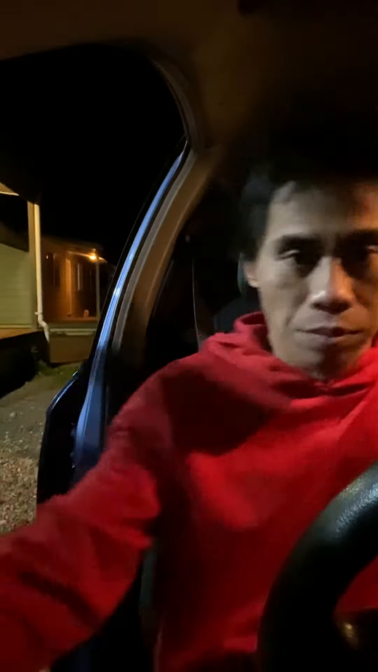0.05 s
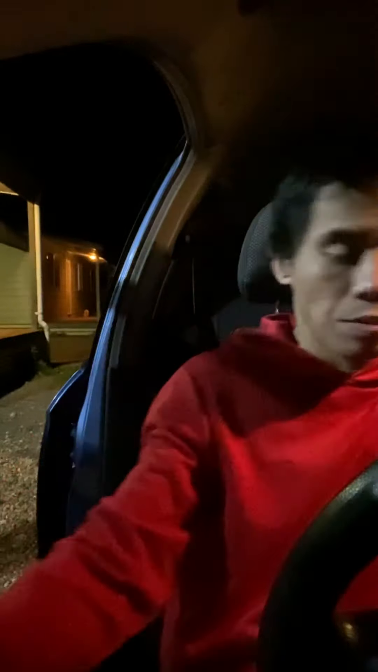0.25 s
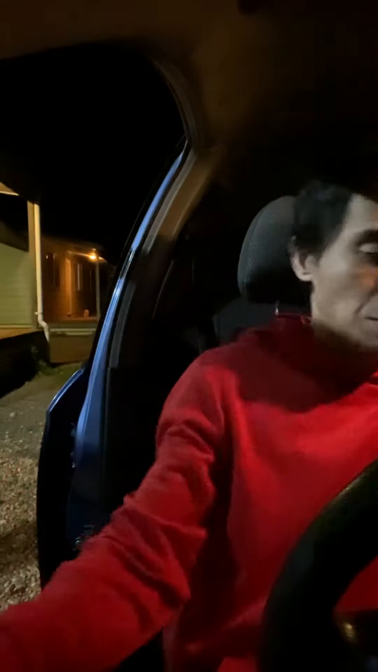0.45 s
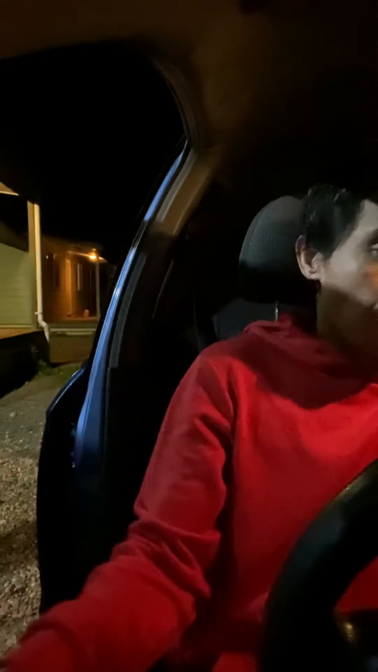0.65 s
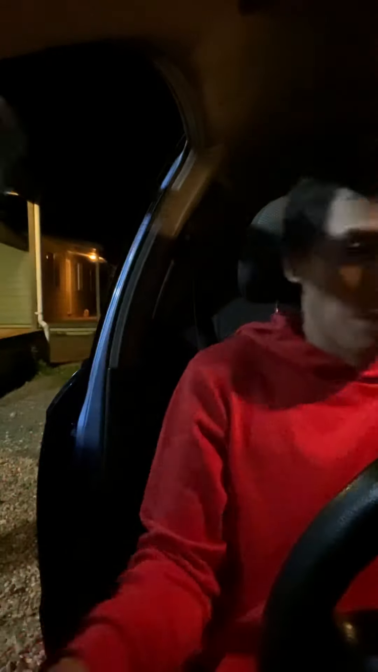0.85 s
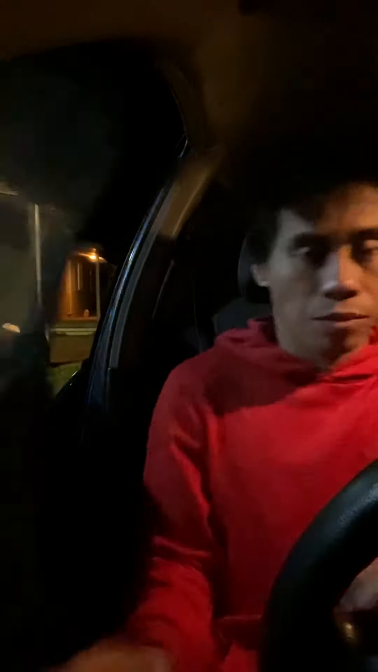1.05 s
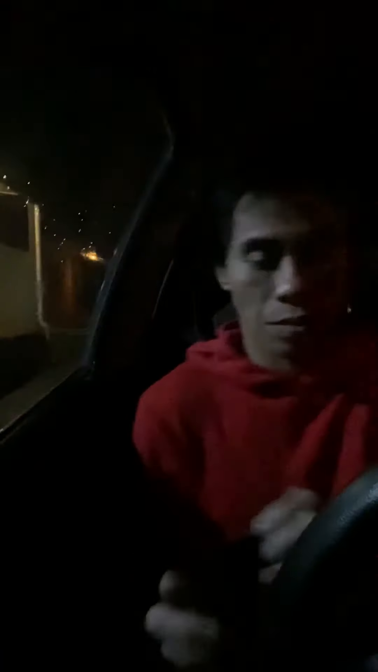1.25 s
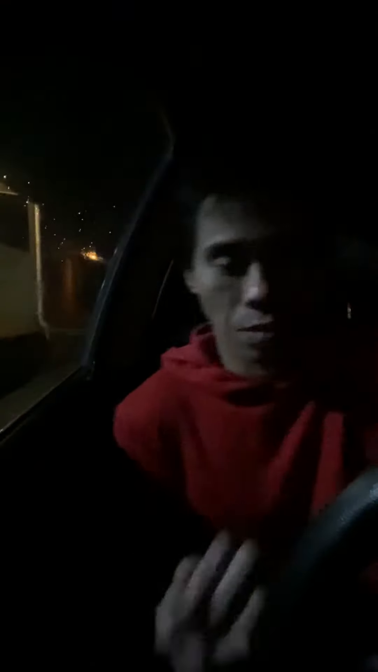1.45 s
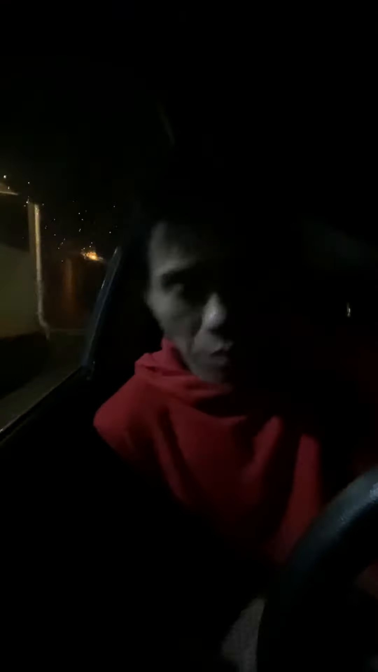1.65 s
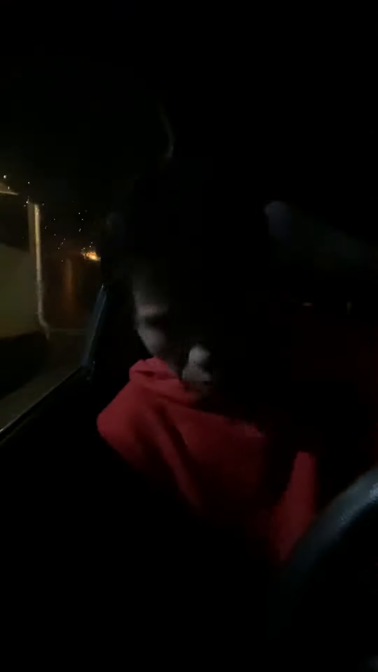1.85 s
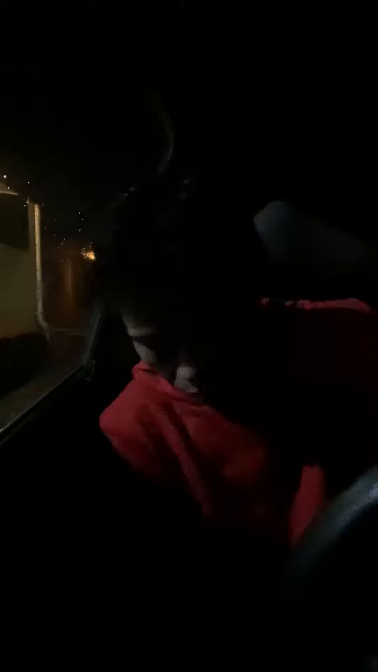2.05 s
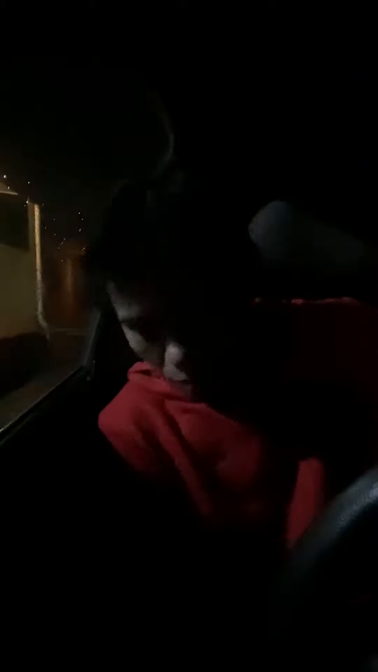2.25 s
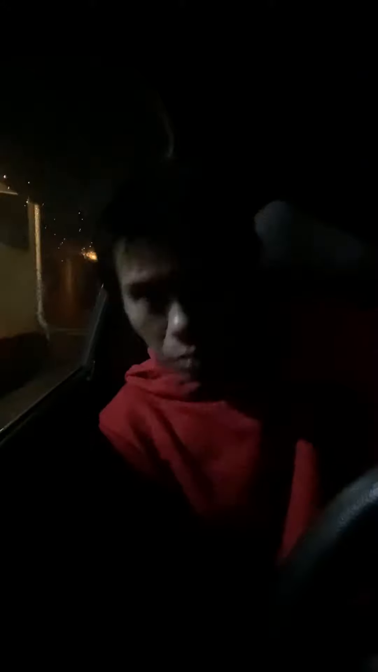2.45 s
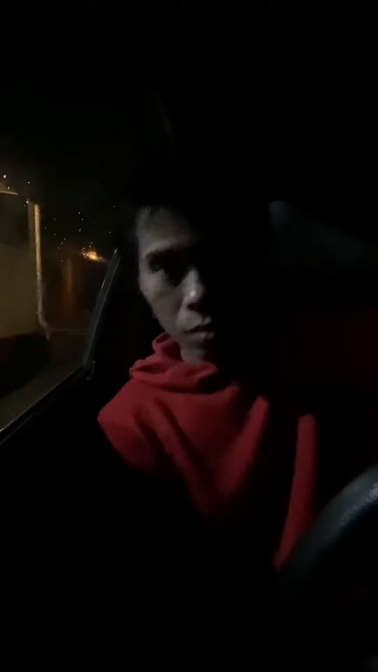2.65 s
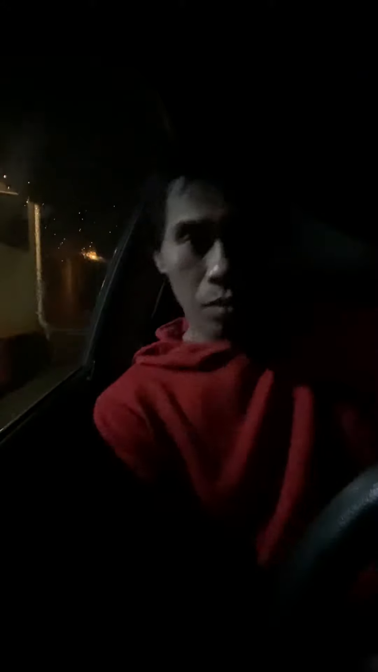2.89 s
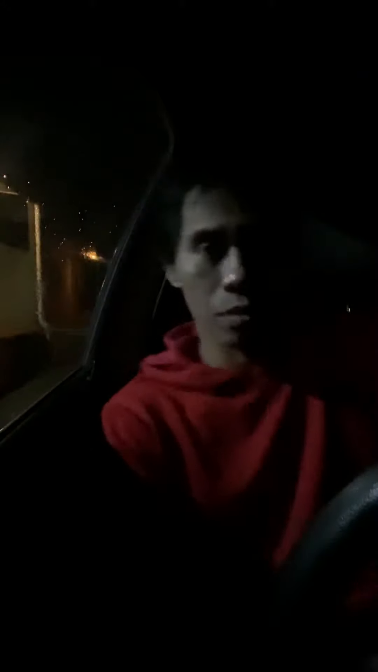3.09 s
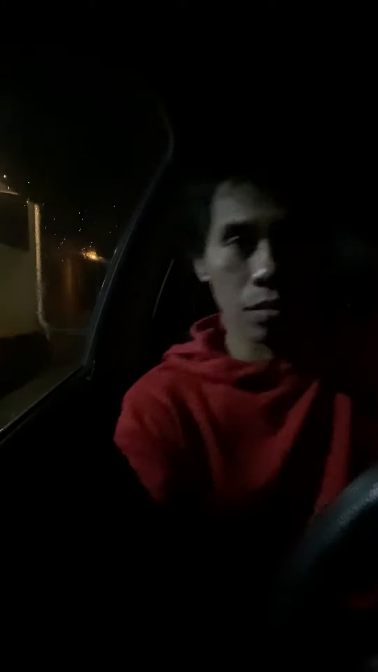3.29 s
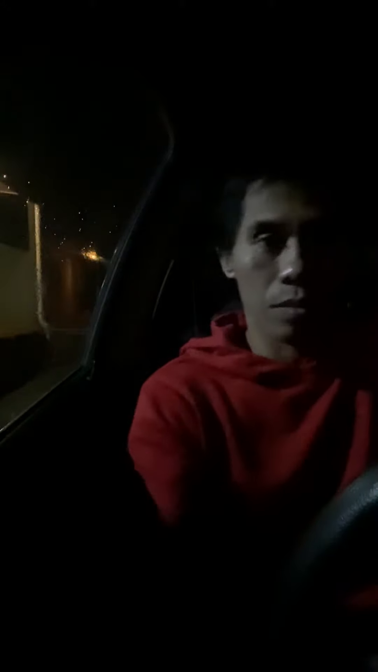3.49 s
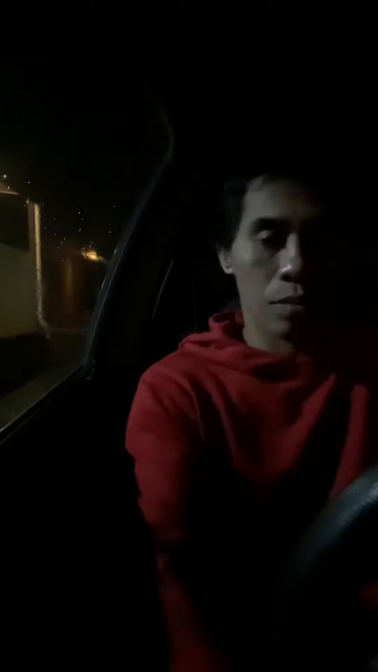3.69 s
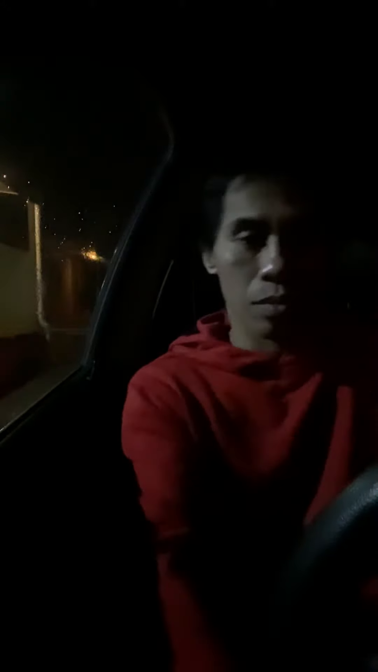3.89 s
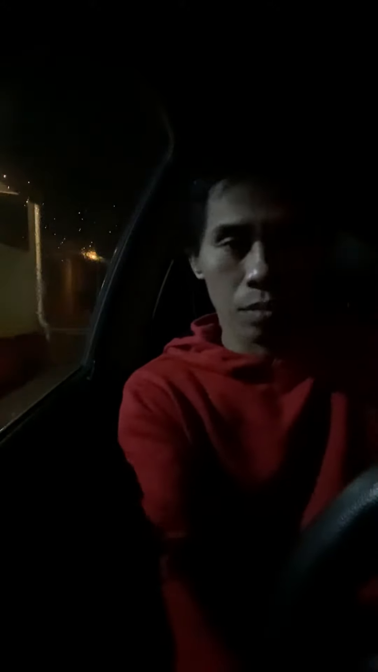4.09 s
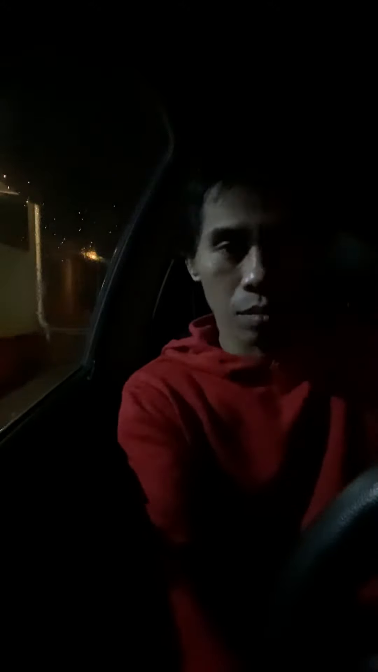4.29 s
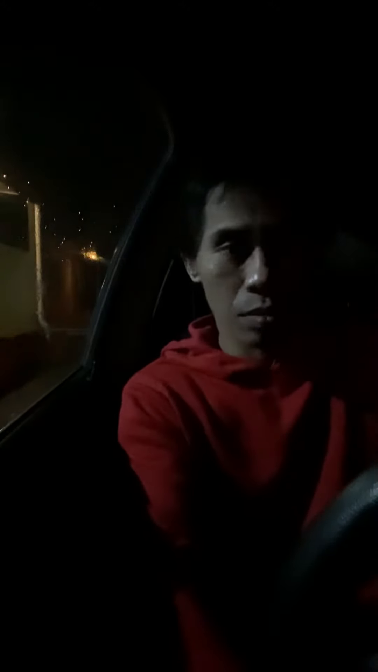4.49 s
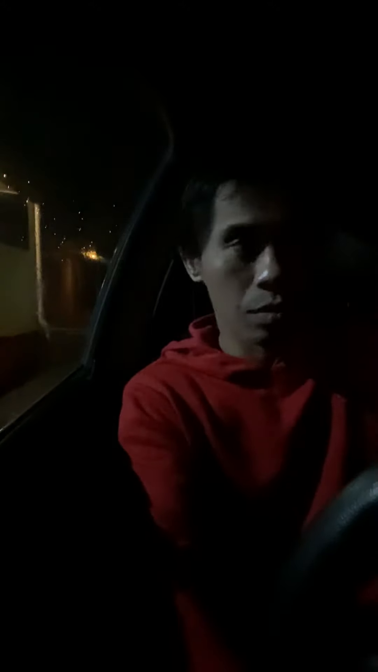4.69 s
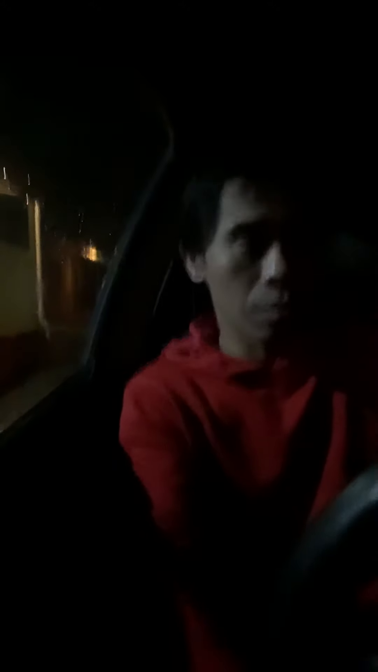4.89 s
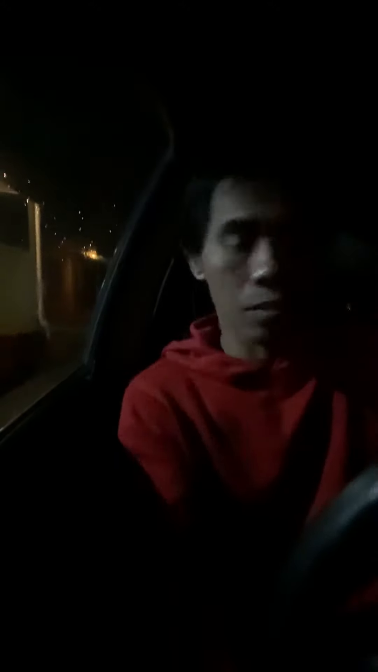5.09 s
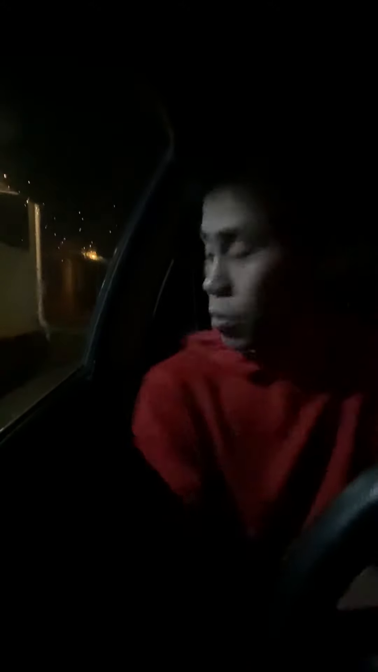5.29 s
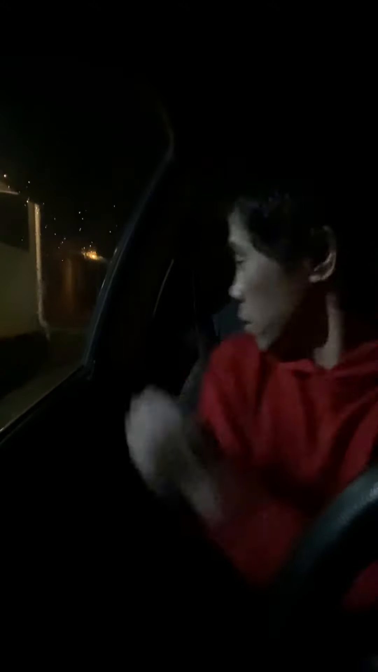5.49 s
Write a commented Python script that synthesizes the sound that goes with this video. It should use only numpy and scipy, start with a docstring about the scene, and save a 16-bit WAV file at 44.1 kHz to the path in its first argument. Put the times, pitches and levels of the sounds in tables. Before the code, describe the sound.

The interior of a parked car, close and dry, with very short padded echoes. For the first second there is only soft low rumble, faint cloth rustle and a small dull bump near 0.2 s. At about 1.15 s the door slams: a latch clank, a hard crack and deep thump, a brief rattle choked by the seal, and a low boom fading by about 1.5 s. Light movement and tiny key ticks follow. From 2.2 to 2.6 s comes a cluster of bright metallic jingles and plastic snaps, another clack at 3.0, and the sharpest clicks at 3.35 to 3.45 s. It quiets to faint rustling. At 4.2 s the starter growls in short, muted heaves with a faint gear whine. Near 4.7 s the engine catches, runs up in pitch, and by 5.1 s hums low around 50 Hz with soft uneven knocks, some last trim clicks and a bump, continuing to the end at 5.5 s.

```python
"""A car door slams at night, seats and clothes rustle, keys and trim click, then the engine starts and hums.
The slam is fading noise with a ringing latch; knocks are dying sines, and clicks are bursts of grit with rings.
The starter is noise through resonances; the engine is a low sine with a knock for each firing.
A soft rumble and hiss lie under it all, and short echoes give the knocks, clicks and motors a padded cabin."""
import sys
import numpy as np
from scipy import signal
from scipy.fft import rfft, irfft, next_fast_len
from scipy.io import wavfile
from scipy.ndimage import uniform_filter1d

SR = 44100
rng = np.random.default_rng(int(sys.argv[2]) if len(sys.argv) > 2 else 0)


def volts(x):
    """Linear amplitude factor 10**(x/20) for a level x in dB, scalar or array-like."""
    e = np.asarray(x, float) / 20
    return 10 ** e


def digitize_waveform(pressure):
    """Quantize a signal to 16-bit integers and store it at the path in sys.argv[1].

    Rows of a 2-D input are taken as channels; values are limited to [-1, 1].
    """
    field = np.atleast_2d(pressure).T
    bounded = np.clip(field, -1, 1)
    quanta = np.round(bounded * 32767).astype(np.int16)
    wavfile.write(sys.argv[1], SR, quanta)


N = 244314  # length in samples

# Rumble and hiss from the driver moving and later the engine.
# Each row: time in seconds, rumble level in dB, rustle level in dB.
STIR_LEVELS = [(0, -43.5, -56), (.3, -45.5, -58), (.5, -55, -58), (1.3, -62.5, -59), (1.5, -45, -53.5),
               (1.95, -44, -56.5), (2.15, -47, -58), (2.55, -38, -53.5), (2.8, -39.5, -45),
               (3.15, -51, -59), (3.45, -40, -44.5), (3.53, -37, -53.5), (3.8, -50.5, -60.5),
               (4.19, -56.5, -71), (4.26, -35, -61.5), (4.6, -40, -67.5), (4.8, -30, -51.5),
               (5.54, -34, -44.5)]
# Tone balance of the rumble. Each row: pitch in Hz, relative level in dB per Hz.
RUMBLE_SPECTRUM = [(25, -10), (70, 3), (140, -4), (300, -12), (1500, -41.5)]
# Tone balance of the rustle. Each row: pitch in Hz, relative level in dB per Hz.
RUSTLE_SPECTRUM = [(450, 0.5), (800, 2), (1150, -5.5), (2300, -9.5), (7400, -19.5), (11500, -30)]
# Bands where the hiss stands out. Each row: pitch in Hz, width in Hz, relative level in dB.
HISS_PEAKS = [(2320, 240, -10), (4000, 420, -9)]
# How alike left and right noise are. Each row: pitch in Hz, likeness from -1 (opposite) to 1 (same).
STEREO_LIKENESS = [(60, 1.0), (220, 1), (840, -0.44), (3120, -0.0097), (11700, 0.77)]
RUSTLE_PATCHY_DB = 2
# The slam shakes the whole shell: the rumble swells to a top, then dies.
SHAKE_TOP_S, SHAKE_DB, SHAKE_RISE_DB_PER_S, SHAKE_FALL_DB_PER_S = 1.242, -18.5, 153.5, 253

# Soft heavy knocks through the body shell. Each row: start in seconds, level in dB, pitch in Hz.
SHELL_KNOCKS = [(0.186, -25, 270), (1.048, -26.5, 150), (1.154, -8, 195), (1.169, 1, 158), (1.178, -3, 207),
                (1.208, 0, 96), (1.261, -8.5, 63.3), (1.34, -11, 49.5), (1.72, -17.5, 157),
                (2.468, -20, 410), (3.015, -20, 280), (3.372, -16.5, 250), (3.505, -21.5, 122.4),
                (4.246, -18, 143), (4.285, -20.5, 63.6), (4.658, -21.5, 149), (5.047, -11, 170)]

# Hard small contacts of keys, lock and trim. Each row: start in seconds, level in dB, part name,
# fading time of the rattle in ms, brightness in dB.
SMALL_CONTACTS = [(0.191, -34.5, "panel", 34, -10), (1.293, -36.5, "clip", 4.1, -8),
                  (1.612, -41, "key", 4.3, -0.5), (1.769, -34.5, "key", 5.3, 2),
                  (2.177, -26.5, "ring", 6.3, -4.5), (2.209, -27.5, "ring", 2.3, 16),
                  (2.217, -20, "clip", 6.6, -7), (2.266, -26, "clip", 4.5, -12),
                  (2.307, -38.5, "lever", 4.2, -7), (2.354, -34, "key", 6.1, -0.5),
                  (2.372, -19.5, "ring", 8.5, 8), (2.378, -9.5, "housing", 3.8, -4.5),
                  (2.433, -25.5, "lever", 4.2, 4.5), (2.448, -16.5, "ring", 17, 0),
                  (2.469, -22.5, "lever", 10, -0.5), (2.521, -25.5, "ring", 5.9, -12),
                  (2.531, -10, "clip", 2.4, 8.5), (2.619, -26, "lever", 4.1, -6),
                  (2.73, -30, "clip", 3.4, -9.5), (3.008, -20.5, "housing", 6, 5.5),
                  (3.33, -20.5, "lever", 7.5, -15.5), (3.342, -11, "lever", 3.7, 3.5),
                  (3.368, -7, "housing", 7, 12), (3.442, -16, "key", 6, 4.5),
                  (3.497, -33.5, "clip", 7.5, -28), (3.563, -33, "key", 6.7, -18),
                  (3.624, -31, "housing", 4.5, 0.5), (3.952, -44.5, "clip", 8.7, -2.5),
                  (4.219, -34.5, "lever", 40, -16), (4.653, -36.5, "clip", 6.2, -19),
                  (4.677, -32.5, "ring", 3.7, -3.5), (4.779, -30, "housing", 4, -21),
                  (4.795, -33.5, "lever", 3.6, -11), (4.85, -36, "ring", 6.1, -14.5),
                  (4.909, -32, "key", 9.1, -9), (4.953, -19, "lever", 6, -2.5),
                  (5.039, -22, "panel", 7, -10), (5.06, -22, "panel", 24, -36)]
# The parts that get knocked. Each name leads to: own ring in Hz, ring level in dB against the crunch.
PART_RINGS = {"panel": (580, 0), "housing": (1254, 2.1), "lever": (2300, -8.5), "clip": (2200, -10),
              "key": (4000, 0.39), "ring": (7000, -0.41)}
# Every contact is followed by one small bounce, after a chance wait with this average added.
BOUNCE_WAIT_S, BOUNCE_DB, BOUNCE_MS = 0.036, -25.5, 2.6
OWN_CYCLES = 10  # cycles in which a part's own ring falls by 60 dB
GRIT_SPREAD_DB, LUMP_MS, LUMP_DB = 6.5, 2.7, 3  # the rattle comes in lumps
# Each contact wakes eight short rings of loose metal at chance pitches, strongest near the part's own ring.
METAL_HZ = 1195, 8200  # lowest, highest
METAL_T60_S, METAL_DB_PER_OCTAVE, METAL_DB = .013, 4, -4

# Low tones held for a while: a boom just before the door shuts, cabin booms after the slam, and the engine's
# drone as it catches. # Each row: start in seconds, length in seconds, pitch in Hz, peak level in dB.
LOW_TONES = [(1.07, 0.053, 115, -21.5), (1.368, .15, 50.4, -13), (1.513, 0.15, 48.8, -22.5),
             (1.677, 0.25, 51, -31), (5.062, 0.13, 102.4, -15.5)]

# The ringing latch. Each row: pitch in Hz, relative level in dB.
LATCH_RINGS = [(600, -14), (1250, -3.5), (1390, -7.5)]
# Tone balance of the crash. Each row: pitch in Hz, relative level in dB per Hz.
SLAM_SPECTRUM = [(150, -11.5), (500, -19.5), (970, -24.5), (3900, -31.5), (5700, -35.5), (11500, -55.5)]
LATCH_S, LATCH_GRIND_S = 1.147, 0.008
# The crash: a scrape as the latch meets, the blow's first crack, its rattle, and the seal choking it.
SCRAPE_S, SCRAPE_DB, SCRAPE_DB_PER_S = 1.151, -20.5, 1502
BLOW_S, BLOW_DB, CRACK_DB_PER_S = 1.167, 1, 2100.5
RATTLE_DB, RATTLE_DB_PER_S, SEALED_S, SEALED_DB_PER_S = -10, 295.5, 1.24, 390
DOOR_LEFT_DB = 0.5  # raises left and lowers right

# Growl of the starter in the shell. Each row: pitch in Hz, width in Hz, relative level in dB.
STARTER_PEAKS = [(130, 41, -9), (250, 63, 6.5), (336, 79.3, 5), (830, 430, -16.5)]
# Whine of the gears. Each row: pitch in Hz, width in Hz, relative level in dB.
GEAR_PEAKS = [(2190, 200, 10), (2840, 370, 8), (3900, 250, 5.5), (5500, 130, 1.5), (7320, 200, -5)]
# The starter labours at each compression. Each row: time in seconds, growl level in dB.
STARTER_HEAVES = [(4.269, -31), (4.439, -39), (4.502, -34.5), (4.681, -39.5), (4.798, -38)]
HEAVE_RISE_DB_PER_S, HEAVE_FALL_DB_PER_S, STARTER_ON_S, STARTER_OFF_S = 355, 261, 4.21, 4.95
GROWL_ROUGH_DB = 2
# The gear whine swings with the cranking speed and swells to one top.
WHINE_TOP_S, WHINE_DB, WHINE_RISE_DB_PER_S, WHINE_FALL_DB_PER_S = 4.49, -59, 45, 35
FASTEST_S, SWING_S, SPEED_SWING = 4.44, 0.34, 0.045  # a fastest moment, swing period, share of speed

# Level of the engine hum. Each row: time in seconds, level in dB.
HUM_LEVELS = [(4.72, -47), (4.8, -27.5), (4.95, -28.5), (5.1, -20.5), (5.29, -23), (5.34, -25),
              (5.54, -23.5)]
# Resonances of the engine block. Each row: pitch in Hz, width in Hz, relative level in dB.
BLOCK_PEAKS = [(101.5, 35, 14), (124.5, 70.5, 11.5), (270, 53, 2), (895, 430, -10)]
# The engine catches, runs up to a fast idle and sags; the rates are firings per second.
CATCH_S, CATCH_PER_S, IDLE_S, IDLE_PER_S, RUN_UP_BEND, SAG_PER_S2 = 4.72, 25, 5.17, 50.8, 0.86, 3.2
KNOCK_DB, KNOCK_GROWS_DB_PER_S, IDLE_KNOCK_DB = -35, 9.5, -38  # hard under load, softer at idle
FIRING_SPREAD_DB = 2.5

CABIN_T60_S, SEAT_CUT_HZ = 0.082, 11000  # time to fall by 60 dB in the bass, where echoes turn dull
LEFT_DB, NEAR_SHARE, NEAR_HZ = 0.64, 0.39, 150  # low knocks lean left above this pitch
LAG_S, LAG_BELOW_HZ = .0005, 2600  # the duller part of hard sounds reaches the left side later
LEFT_RIGHT = np.array([[1], [-1]])
CEILING = .97  # peaks are rounded toward this height


def in_time(rows):
    """Reads a table's columns as points joined by straight lines, one value for every sample."""
    s, *columns = np.transpose(rows)
    return [np.interp(np.arange(N) / SR, s, column) for column in columns]


def at_hz(points, hz):
    """Reads a spectrum at a pitch, with pitch on a log axis."""
    table_hz, values = np.array(points).T
    return np.interp(np.log(hz), np.log(table_hz), values)


def rms_one(x):
    """Scales a sound to an average strength (rms) of 1."""
    return x / np.sqrt(np.mean(x ** 2) + 1e-20)


def band_pass(x, order, low, high):
    """Keeps the pitches between two limits in Hz."""
    return signal.sosfilt(signal.butter(order, [low, high], "band", fs=SR, output="sos"), x)


def drift(rate):
    """Makes a slow random wander with spread 1; a higher rate in Hz wanders faster."""
    r = np.exp(-80 * np.pi * rate / SR)
    chance = rng.standard_normal(N // 40 + 2002)  # one value per 40 samples
    slow = signal.lfilter([1], [1, -2 * r, r * r], chance)[2000:]
    return np.interp(np.arange(N) / 40, np.arange(len(slow)), rms_one(slow))


def ring(x, hz, t60):
    """Sets a dying sine ringing: a unit click gives height 1, falling 60 dB in t60 seconds."""
    r = volts(-60 / (max(t60, .002) * SR))
    w = 2 * np.pi * hz / SR
    return signal.lfilter([0, np.sin(w)], [1, -2 * r * np.cos(w), r * r], x + 1e-18)


def resonances(x, peaks):
    """Passes a sound through side-by-side resonances, added with alternating signs."""
    out = 0
    for k, (hz, width, level_db) in enumerate(peaks):
        r = np.exp(-np.pi * width / SR)
        feedback = [1, -2 * r * np.cos(2 * np.pi * hz / SR), r * r]
        band = signal.lfilter([1 - r * r, 0, r * r - 1], feedback, x)
        out = out + (-1) ** k * volts(level_db) * band
    return out


def coloured(spectrum, patchy_db):
    """Builds stereo noise of rms 1 from half-octave bands, each with its own level, flicker and likeness."""
    out = 0
    edges = 25 * 2 ** np.arange(0, 9.3, .5)
    white = rng.standard_normal((2, 2, N))
    for k, (low, high) in enumerate(zip(edges, edges[1:])):
        hz = np.sqrt(low * high)
        if not spectrum[0][0] / 1.5 < hz < spectrum[-1][0] * 1.5:
            continue
        mid, side = band_pass(white[k % 2], 2, low, high)
        alike = np.clip(at_hz(STEREO_LIKENESS, hz), -1, 1)
        gain = volts(at_hz(spectrum, hz) + patchy_db * drift(12.0))
        out = out + gain * (np.sqrt(1 + alike) * mid + np.sqrt(1 - alike) * side * LEFT_RIGHT)
    return rms_one(out)


def tent(s, top_db, rise, fall):
    """A level that climbs to a top and falls away, both at steady dB per second."""
    t = np.arange(N) / SR - s
    return volts(top_db + np.where(t < 0, rise * t, -fall * t))


def between(start, end):
    """Is true from start to end and false outside."""
    t = np.arange(N) / SR
    return (t >= start) & (t <= end)


def add(out, s, sound):
    """Mixes a sound in at a time in seconds."""
    i = round(s * SR)
    out[i:i + len(sound)] += sound[:len(out) - i]


def stir():
    """Movement and the engine give low rumble and soft hiss: two coloured noises under level curves."""
    rumble_db, rustle_db = in_time(STIR_LEVELS)
    shake = tent(SHAKE_TOP_S, SHAKE_DB, SHAKE_RISE_DB_PER_S, SHAKE_FALL_DB_PER_S)
    rumble = (volts(rumble_db) + shake) * coloured(RUMBLE_SPECTRUM, patchy_db=3.5)
    rustle = coloured(RUSTLE_SPECTRUM, patchy_db=RUSTLE_PATCHY_DB)
    rustle = rustle + sum(resonances(rustle, [peak]) for peak in HISS_PEAKS)
    return rumble + volts(rustle_db) * rustle


def thuds():
    """A soft push sets a panel ringing some cycles, with a short shudder of its neighbours."""
    out, t = np.zeros(N), np.arange(SR // 2) / SR
    for s, level_db, hz in SHELL_KNOCKS:
        swell = 1 - np.exp(-t * hz * 2.7)  # the push builds within about a cycle
        fade = volts(-4.5 * t * hz * (hz / 100) ** 0.69)
        tone = swell * fade * np.sin(2 * np.pi * hz * t)
        shudder = rms_one(band_pass(rng.standard_normal(len(t)), 2, 1.16 * hz, 2.91 * hz))
        shudder = 0.24 * swell * volts(-2.5 * t * hz) * shudder
        add(out, s, volts(level_db) * (tone + shudder))
    return out


def clicks():
    """Each contact is a tick and a dying gritty rattle that rings the part and loose metal."""
    out, t = np.zeros(N), np.arange(SR // 6) / SR
    luck = rng.exponential(1, (len(SMALL_CONTACTS), 2))
    bounces = []
    for (s, db, part, ms, bright), (wait, weak) in zip(SMALL_CONTACTS, luck):
        later = s + ms / 500 + BOUNCE_WAIT_S * wait
        bounces.append((later, db + BOUNCE_DB - 5.6 * weak, part, BOUNCE_MS, bright))

    for s, level_db, part, length_ms, bright_db in SMALL_CONTACTS + bounces:
        own_hz, own_db = PART_RINGS[part]
        fade_ms = max(length_ms, 1)
        chance = rng.standard_normal((3, len(t)))
        lumps_db = LUMP_DB * np.interp(t * 1000 / LUMP_MS, np.arange(len(t)), chance[2])
        fade = (1 - np.exp(-t * 3500 / fade_ms)) * np.exp(-t * 1000 / fade_ms)
        grit = chance[0] * volts(GRIT_SPREAD_DB * chance[1] + lumps_db) * fade
        grit[0] += 13.0 / fade_ms  # short contacts start hardest

        # hollow trim behind, then the bare contact
        crunch = band_pass(grit, 3, min(330, own_hz / 2), min(4000, 2.32 * own_hz))
        crack = band_pass(grit, 2, 3200, 10500)
        own_ring = ring(grit, own_hz, OWN_CYCLES / own_hz)
        pitches = np.exp(rng.uniform(*np.log(METAL_HZ), size=8))
        woken_db = -METAL_DB_PER_OCTAVE * np.abs(np.log2(pitches / own_hz))
        metal = sum(volts(db) * ring(grit, hz, METAL_T60_S) for hz, db in zip(pitches, woken_db))

        sound = rms_one(crunch) + volts(own_db) * rms_one(own_ring) + volts(bright_db) * rms_one(crack)
        sound = sound + volts(METAL_DB + min(bright_db, 0) / 2) * rms_one(metal)
        loudest = uniform_filter1d(np.abs(sound), size=64).max()
        add(out, s, volts(level_db) * sound / loudest / 3.3)
    return out


def low_tones():
    """Cabin booms and the engine's drone swell and sink: a pure low sine under a rounded envelope."""
    out = np.zeros(N)
    for s, length, hz, peak_db in LOW_TONES:
        t = np.arange(round(length * SR)) / SR
        envelope = np.abs(np.sin(np.pi * (t / length) ** 0.37)) ** 0.94
        add(out, s, volts(peak_db) * envelope * np.sin(2 * np.pi * hz * t))
    return out


def door():
    """The latch grinds onto the striker and rings; the closing panel crashes and rattles out."""
    strike, length = np.zeros(N), round(LATCH_GRIND_S * SR)
    add(strike, LATCH_S, np.hanning(length) * rng.standard_normal(length))
    # ringing twice over makes a softer start
    latch = sum(volts(db) * ring(ring(strike, hz, .013), hz, .013) for hz, db in LATCH_RINGS)
    latch = band_pass(latch, 2, 500, 1500)
    latch = volts(-0.4) * latch / np.abs(latch).max()

    seal = tent(SEALED_S, 0, 0, SEALED_DB_PER_S)
    rattle = tent(BLOW_S, RATTLE_DB, 12000, RATTLE_DB_PER_S) * seal
    crack = tent(BLOW_S, BLOW_DB, 9700, CRACK_DB_PER_S)
    scrape = tent(SCRAPE_S, SCRAPE_DB, SCRAPE_DB_PER_S, SCRAPE_DB_PER_S / 2)
    level = np.maximum(rattle, crack) + scrape
    crash = level * coloured(SLAM_SPECTRUM, patchy_db=1.0) * volts(DOOR_LEFT_DB * LEFT_RIGHT)
    return latch, crash


def starter():
    """The motor growls through the shell; the gear whine is read faster or slower as crank speed swings."""
    rough = rng.standard_normal(N) * volts(GROWL_ROUGH_DB * drift(44))
    growl = rms_one(resonances(rough, STARTER_PEAKS))
    effort = sum(tent(s, db, HEAVE_RISE_DB_PER_S, HEAVE_FALL_DB_PER_S) for s, db in STARTER_HEAVES)

    t = np.arange(N) / SR
    speed = 1 + SPEED_SWING * np.cos(2 * np.pi * (t - FASTEST_S) / SWING_S)
    steady = rms_one(resonances(rng.standard_normal(2 * N), GEAR_PEAKS))
    whine = np.interp(np.cumsum(speed), np.arange(2 * N), steady)
    swell = tent(WHINE_TOP_S, WHINE_DB, WHINE_RISE_DB_PER_S, WHINE_FALL_DB_PER_S)
    whine = whine * swell * volts(2.7 * drift(25))
    return between(STARTER_ON_S, STARTER_OFF_S) * (effort * growl + whine)


def engine():
    """The firing rate booms as a sine; each uneven firing knocks through the block."""
    t = np.arange(N) / SR
    running = t > CATCH_S
    run_up = np.clip((t - CATCH_S) / (IDLE_S - CATCH_S), 0, 1)
    sag = SAG_PER_S2 * np.maximum(t - IDLE_S, 0)
    per_s = CATCH_PER_S + (IDLE_PER_S - CATCH_PER_S) * run_up ** RUN_UP_BEND - sag
    firings = np.cumsum(per_s * running) / SR  # running count
    hum = np.sqrt(2) * volts(in_time(HUM_LEVELS)[0]) * np.sin(2 * np.pi * firings)

    # a pulse whenever the count passes a whole number
    fired = np.diff(np.floor(firings), prepend=0) * volts(FIRING_SPREAD_DB * rng.standard_normal(N))
    puff = signal.lfilter([1], [1, -.995], fired) * rng.standard_normal(N) * 0.088
    knocks = resonances(uniform_filter1d(fired, size=60) * 4.9 + puff, BLOCK_PEAKS)
    load_db = KNOCK_DB + KNOCK_GROWS_DB_PER_S * (t - CATCH_S)
    knock_db = np.where(run_up < .9, load_db, IDLE_KNOCK_DB)
    return running * (hum + volts(knock_db) * knocks / np.std(knocks[running]))


def cabin(x):
    """Padded walls echo the sound: six short feedback delays a side, duller on every round."""
    size = next_fast_len(N + SR // 2)
    hz = np.arange(size // 2 + 1) * SR / size
    spectrum, out = rfft(x, size), []
    for lags in rng.uniform(.003, 0.009, (2, 6)):  # seconds
        echoes = 0
        for k, lag in enumerate(lags):
            loss = volts(-60 * lag / CABIN_T60_S) / (1 + 1j * hz / SEAT_CUT_HZ)
            one_round = loss * np.exp(-2j * np.pi * hz * lag)
            echoes = echoes + (-1) ** k * one_round / (1 - one_round)  # all rounds together
        out.append(irfft(spectrum * echoes, size)[:N])
    return np.array(out)


def scene():
    """Mixes all sources, a little to the left, with cabin echoes of the hard and deep ones."""
    latch, crash = door()
    hard = clicks() + starter()
    dull = signal.sosfiltfilt(signal.butter(2, LAG_BELOW_HZ, fs=SR, output="sos"), hard)
    late_dull = np.roll(dull, round(LAG_S * SR))
    hard_stereo = np.array([hard - dull + late_dull, hard])

    low_sounds = thuds() + low_tones() + engine()
    deep = low_sounds + latch
    near = signal.sosfilt(signal.butter(1, NEAR_HZ, "high", fs=SR, output="sos"), low_sounds)
    deep_stereo = deep + NEAR_SHARE * near * LEFT_RIGHT

    echoes = volts(-7.5) * cabin(hard) + volts(-11.5) * cabin(deep)
    mix = hard_stereo + deep_stereo + crash + stir() + echoes
    return mix * volts(LEFT_DB * LEFT_RIGHT)


def top_cut(x):
    """Nothing passes above the cut-off."""
    return signal.sosfilt(signal.butter(12, 12260, fs=SR, output="sos"), x)


def record(dry):
    """The microphone loses the deepest bass and the top; peaks are rounded."""
    x = signal.sosfilt(signal.butter(2, 22, "high", fs=SR, output="sos"), dry)
    x = signal.sosfilt(signal.butter(8, 10800, fs=SR, output="sos"), x)
    return top_cut(CEILING * np.tanh(x / CEILING))


dry = scene()
out = record(dry)
digitize_waveform(out)
```